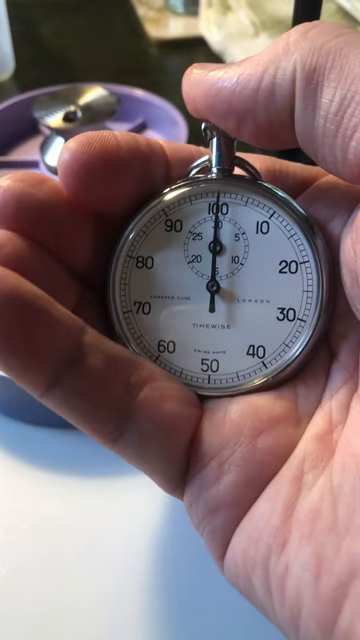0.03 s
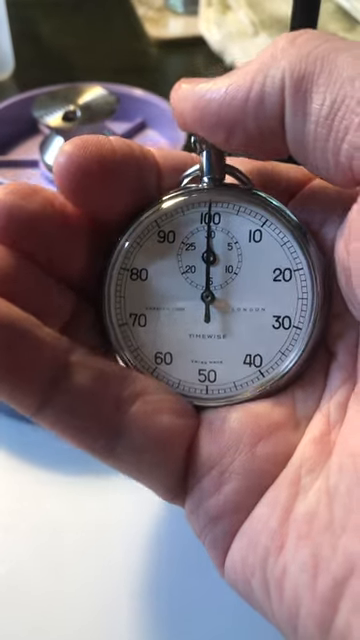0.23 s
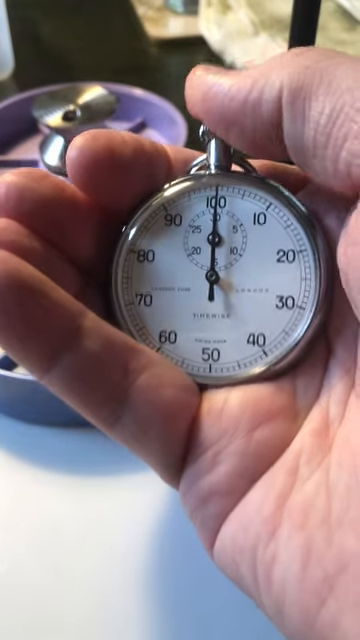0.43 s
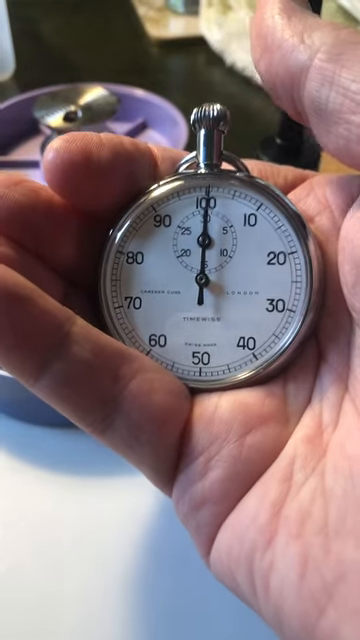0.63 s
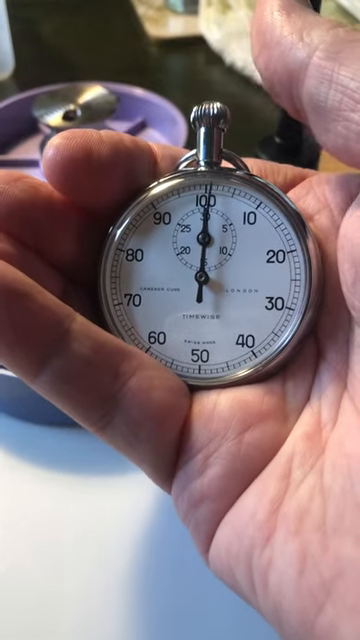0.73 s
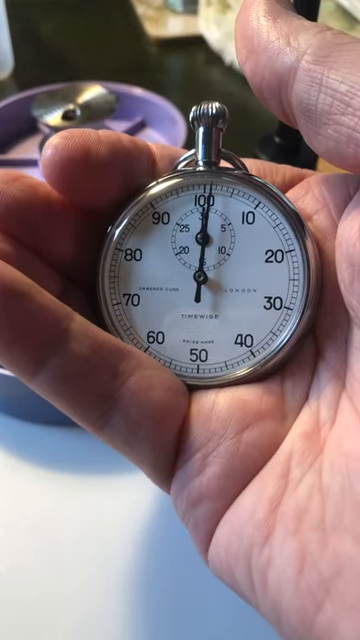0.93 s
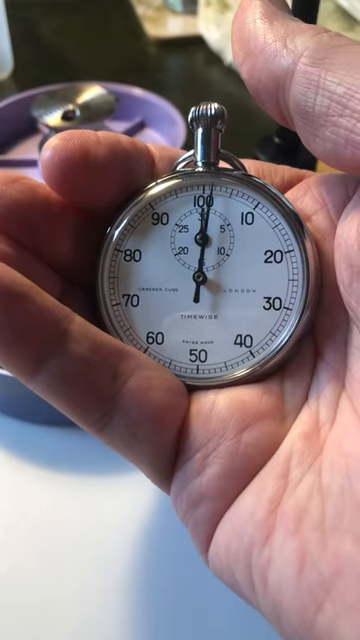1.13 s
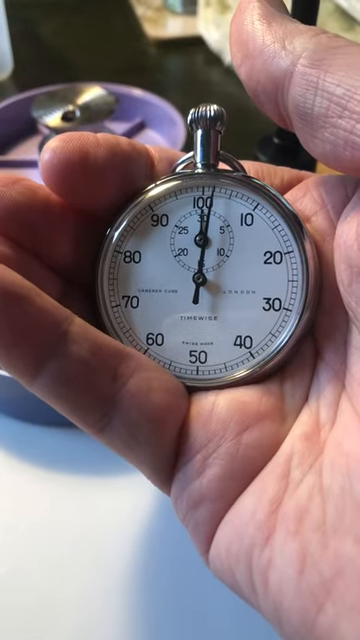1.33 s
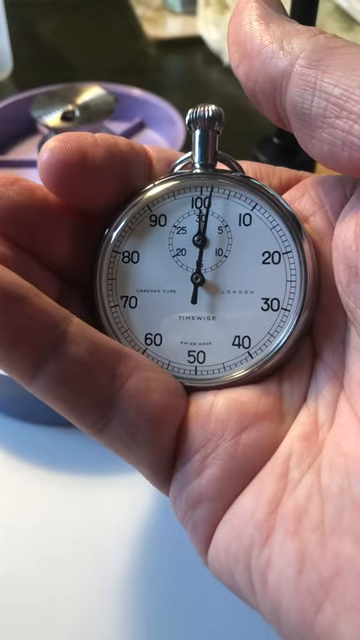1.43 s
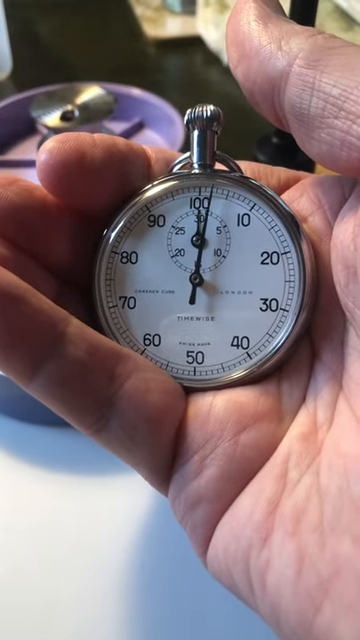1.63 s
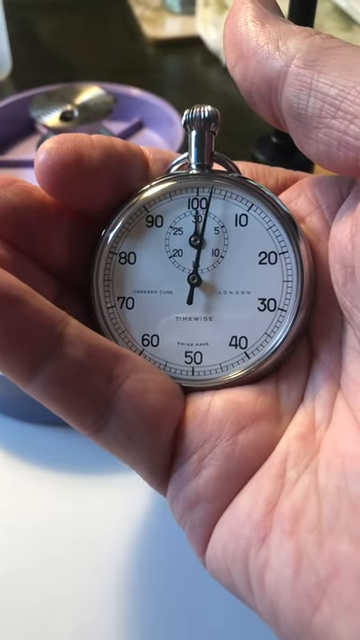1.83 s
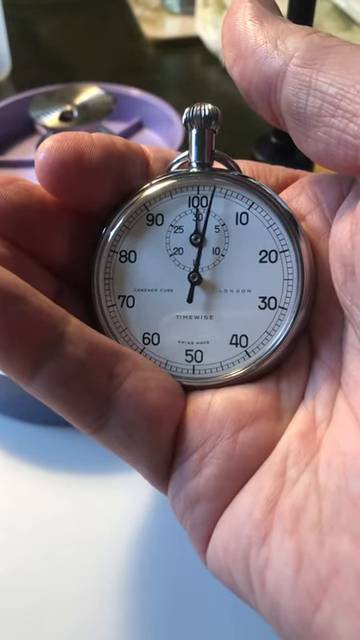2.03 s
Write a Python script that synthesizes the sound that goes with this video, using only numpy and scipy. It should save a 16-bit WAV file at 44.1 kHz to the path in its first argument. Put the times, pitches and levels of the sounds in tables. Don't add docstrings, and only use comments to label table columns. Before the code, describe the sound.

Mechanical stopwatch crown clicked down and released, two sharp metallic snaps, then faint rapid ticking

```python
import sys
import numpy as np
from scipy import signal
from scipy.fft import rfft, irfft
from scipy.io import wavfile
from scipy.ndimage import uniform_filter1d

SR = 44100
rng = np.random.default_rng(int(sys.argv[2]) if len(sys.argv) > 2 else 0)


def store_pcm(level_fs):
    pcm = np.round(np.clip(level_fs, -1, 1) * 32767).astype(np.int16)
    wavfile.write(sys.argv[1], SR, np.atleast_2d(pcm).T)


def gain_from_decibels(decibels):
    exponent = np.asarray(decibels, float) / 20
    return 10 ** exponent


N = 92610

# centre_hz, width_hz, level_db
PRESS_WALL_COLOUR = [(1700, 650, -18.5), (2623, 66, -3), (3150, 400, -3), (4400, 500, -14.5),
                     (4900, 290, -7.5), (5700, 2100, -4), (5900, 330, -6.5), (7300, 540, -7.5),
                     (8200, 600, -5.5), (10200, 1500, -16.5), (11600, 990, -12), (13200, 1800, -16),
                     (15000, 1000, -20.5)]


def band(x, hz, width):
    return signal.lfilter(*signal.iirpeak(hz, hz / width, fs=SR), x)


def unit(x):
    return x / np.sqrt(np.mean(x ** 2))


def resonant_noise(hz, width):
    return band(band(rng.standard_normal(N), hz, width), hz, width)


def highpass(x, order, hz):
    return signal.sosfilt(signal.butter(order, hz, "highpass", fs=SR, output="sos"), x)


def coloured(points):
    hz, db = np.array(points, float).T
    log_hz = np.log(np.arange(N // 2 + 1) * SR / N + 1)
    gain = gain_from_decibels(np.interp(log_hz, np.log(hz), db, left=-70))
    return unit(irfft(rfft(rng.standard_normal(N)) * gain, N))


def strike(hits, modes, scatter_db=4.08):
    contact_s = .0001
    out = np.zeros(N)
    hz, db, t60 = np.array(modes, float).T[:, :, None]
    size = min(int(t60.max() * 1.3 * SR) + 8, N // 4)
    sign = (-1.) ** np.arange(len(modes))[:, None]
    balance = rng.standard_normal((len(hits), len(modes), 1))
    for (s, peak_db, tilt_db), luck in zip(hits, balance):
        i = int(s * SR) + 1
        t = (np.arange(i, i + size) / SR - s)[:N - i]
        gain = gain_from_decibels(db + tilt_db * np.log2(hz / 5000) + scatter_db * luck - 60 * t / t60)
        ring = gain * np.sin(2 * np.pi * hz * t) * sign
        out[i:i + size] += gain_from_decibels(peak_db) * ring.sum(0) * (1 - np.exp(-t / contact_s))
    return out


def snap(hits, modes):
    watch_low_hz = 2300
    split_hz = watch_low_hz * .9
    case = strike(hits, [m for m in modes if m[0] > split_hz], scatter_db=1.5)
    palm = strike(hits, [m for m in modes if m[0] <= split_hz], scatter_db=1.5)
    return highpass(case, 4, watch_low_hz) + palm


def echo(s, level_db, colour):
    wall_s, build_s = .0115, .003
    t60_low_s, t60_high_s = .42, .25
    near_db, near_t60_s = 11, .03
    i = int(s * SR)
    t = np.arange(N - i) / SR
    late = np.maximum(t - wall_s, 0)
    out = np.zeros(N)
    for hz, width, db in colour:
        t60 = np.interp(hz, [5000, 13000], [t60_low_s, t60_high_s])
        walls = (1 - np.exp(-late / build_s)) * gain_from_decibels(-60 * late / t60)
        near = gain_from_decibels(near_db - 60 * t / near_t60_s)
        grain_db = 1.5 * unit(uniform_filter1d(rng.standard_normal(N), size=300))
        tail = unit(resonant_noise(hz, 1.6 * width) * gain_from_decibels(grain_db))
        out[i:] += gain_from_decibels(level_db + db) * (walls + near) * tail[i:]
    return signal.sosfilt(signal.ellip(8, .3, 40, 15800, fs=SR, output="sos"), out)


def house():
    # centre_hz, width_hz, level_db
    room_modes = [(51, 9, -70.5), (29.8, 17, -88), (104, 30, -76.5), (167.95, 30, -64.5), (205, 46, -64.5),
                  (305, 50, -70.5), (383, 50, -72), (472, 70, -76.5), (640, 210, -73), (1030, 600, -85)]
    # time_s, swell_db
    traffic = [(0, -64.5), (0.499, -66.5), (.9, -65.5), (1.2, -63.5), (1.45, -59.5), (1.7, -63.5),
               (2.1, -69)]
    # frequency_hz, density_db_per_hz
    hiss_spectrum = [(530, -28.5), (900, -4.5), (1150, -1.5), (1220, -6.5), (2300, -14), (2470, -14.5),
                     (4150, -15), (9420, -17.5), (16000, -27.5)]
    s, db = np.array(traffic).T
    swell = gain_from_decibels(np.interp(np.arange(N) / SR, s, db - db.mean()))
    hum = [gain_from_decibels(d) * unit(resonant_noise(hz, 1.6 * w)) for hz, w, d in room_modes]
    hiss = gain_from_decibels(-74.5) * coloured(hiss_spectrum)
    return hum[0] + swell * sum(hum[1:]) + hiss


def touch():
    # start_s, peak_db, tilt_db_per_octave
    touch_hits = [
        (.0385, -72, -3),
        (.04065, -40, 0),
        (.04085, -33, -1),
        (.0414, -39, -1),
        (.0419, -48, 0),
    ]
    # frequency_hz, level_db, t60_s
    touch_modes = [(1500, -9, .005), (2050, -8, .004), (2620, -3, .005), (3150, -7, .004),
                   (4000, -11, .003), (4900, -11, .005), (5400, -11, .005), (6950, -10, .007),
                   (8370, -12, .004), (9580, -9, .004), (11000, -4, .003), (13500, -3, .0035),
                   (14800, -1, .003), (16250, -5, .004)]
    direct = highpass(strike(touch_hits, touch_modes, scatter_db=5), 2, 1100)
    return direct + echo(touch_hits[2][0], -80, PRESS_WALL_COLOUR)


def rattle():
    # start_s, level_db
    knocks = [
        (0.164, -68),
        (0.602, -65),
        (0.971, -68.5),
        (1.405, -66),
        (1.44, -82.5),
        (1.772, -67.5),
        (1.81, -79),
    ]
    # centre_hz, width_hz, level_db
    rattle_modes = [(1300, 400, -5.5), (2100, 520, -4), (2670, 110, -4.5), (2960, 130, -4.5),
                    (3376, 600, -6.5), (4000, 440, -5.5), (4370, 340, -10)]
    rise_s, t60_s = .004, .3
    t = np.arange(N) / SR
    shape = np.zeros(N)
    for s, db in knocks:
        shape += gain_from_decibels(db - 60 * np.maximum(t - s, 0) / t60_s) * np.clip((t - s) / rise_s, 0, 1)
    grain = gain_from_decibels(2.2 * unit(uniform_filter1d(rng.standard_normal(N), size=120)))
    body = sum(gain_from_decibels(db) * unit(resonant_noise(hz, w)) for hz, w, db in rattle_modes)
    return shape * unit(grain * body)


def press():
    # start_s, peak_db, tilt_db_per_octave
    press_hits = [
        (.2179, -44, -1),
        (.2295, -49, -3),
        (.2398, -47, 2),
        (.24097, -4, 0),
        (.24165, -19, -2),
        (.2432, -30, 0),
        (.2442, -33, -2),
    ]
    # frequency_hz, level_db, t60_s
    press_modes = [(620, -31, .005), (980, -26, .006), (1480, -27, .009), (2830, -9, .008),
                   (3270, -4.5, .007), (4300, -18, .004), (5600, -9.5, .006), (6600, -7, .003),
                   (7850, 0, .0027), (9000, -6.5, .004), (10700, -18, .004), (11800, -13, .003),
                   (13200, -21, .004), (15500, -10, .002)]
    # frequency_hz, level_db, t60_s
    press_ring = [(2650, -42, .15), (2735, -43, .14), (3252, -48, .1)]
    snap_s = press_hits[3][0]
    direct = snap(press_hits, press_modes) + strike([(snap_s, 0, 0)], press_ring, scatter_db=5.5)
    return highpass(direct, 2, 420) + echo(snap_s, -46.5, PRESS_WALL_COLOUR)


def escapement():
    # start_s, peak_db
    beats = [(0.3624, -51), (0.5613, -48.5), (0.7617, -47.5), (0.9614, -51.5), (1.1612, -48.5),
             (1.36, -52.5), (1.561, -51), (1.7605, -51), (1.9604, -50)]
    # before_drop_s, level_db
    lead_odd = [
        (.0205, -11),
        (.0125, -8),
    ]
    # before_drop_s, level_db
    lead_even = [
        (.0205, -18),
        (.013, -17),
    ]
    # after_drop_s, level_db
    rebounds = [
        (.0007, -3),
        (.0016, -7),
        (.003, -13),
    ]
    # frequency_hz, level_db, t60_s
    tick_modes = [(2700, -14, 0.0046), (3560, -7, 0.053), (4500, -20.5, 0.0057), (5100, -3, 0.0081),
                  (5840, -14, 0.0031), (6900, -4, 0.0069), (8030, -6, 0.0055), (9230, 1, 0.0063),
                  (9660, -2, 0.0061), (10630, -0.5, 0.011), (12200, -5, 0.0049), (12693, -3.5, 0.0051),
                  (14100, -15, 0.00406), (15330, -11.5, .004)]
    hits = []
    for k, (s, db) in enumerate(beats):
        leads = lead_odd if k % 2 else lead_even
        hits += [(s - lead, db + d, 0) for lead, d in leads]
        hits += [(s, db, 0)]
        hits += [(s + lag, db + d, 0) for lag, d in rebounds]
    return gain_from_decibels(-4.5) * strike(hits, tick_modes, scatter_db=2.5)


def squeak():
    start_s, length_s, level_db, pitch_hz = .385, .11, -81, 9920
    t = np.arange(N) / SR
    shape = np.sin(np.pi * np.clip((t - start_s) / length_s, 0, 1))
    return gain_from_decibels(level_db) * shape * np.sin(2 * np.pi * pitch_hz * t)


def scrapes():
    # start_s, length_s, level_db, centre_hz, width_hz
    slides = [
        (0.453, 0.018, -63.5, 2987, 4000),
        (.4845, 0.0084, -46, 8000, 4000),
        (.4855, 0.0081, -52, 3500, 2030),
    ]
    t = np.arange(N) / SR
    out = np.zeros(N)
    for s, length, db, hz, width in slides:
        shape = np.sqrt(np.clip((t - s) / length, 0, 1)) * (t < s + length)
        out += gain_from_decibels(db) * shape * unit(resonant_noise(hz, width))
    return out


def release():
    # start_s, peak_db, tilt_db_per_octave
    release_hits = [
        (.4730, -54, 2),
        (.4945, -18, -2),
        (.4951, -22, -3),
        (.49598, -3, 0),
        (.4969, -21, -3),
        (.4975, -23, -1),
        (.4981, -25, -3),
    ]
    # frequency_hz, level_db, t60_s
    release_modes = [(1430, -42, .009), (2250, -30, .007), (3430, -12.5, .0075), (4400, -11, .004),
                     (5200, -15, .005), (6940, -13.5, .008), (8300, -1, .0027), (9250, -2, .0035),
                     (10200, -11, .004), (11400, -8.5, .005), (12800, -25, .003), (14100, -29, .005),
                     (15600, -31, .004), (16150, -27, .004)]
    # frequency_hz, level_db, t60_s
    release_ring = [(3450, -40, .045), (4440, -56, .15), (4845, -55, .2)]
    # centre_hz, width_hz, level_db
    release_wall_colour = [(1700, 600, -11.5), (2750, 560, -10.5), (3500, 490, -3.5), (4450, 250, -7),
                           (4853, 200, -2.5), (5200, 300, -5), (6900, 700, -8), (8000, 1000, -3.5),
                           (9600, 1100, -9), (11500, 1100, -7), (13200, 1500, -14.5), (15000, 1000, -18)]
    snap_s = release_hits[3][0]
    direct = snap(release_hits, release_modes) + strike([(snap_s, 0, 0)], release_ring, scatter_db=2)
    return highpass(direct, 2, 1100) + echo(snap_s, -57, release_wall_colour)


def creaks():
    # start_s, peak_db, centre_hz, width_hz
    slips = [(0.656, -63, 6700, 500), (0.655, -64.5, 3870, 900), (.656, -60.5, 1700, 600),
             (.724, -67.5, 3280, 1500), (0.74, -56, 3200, 2000), (0.739, -58, 1300, 1200),
             (0.777, -56, 2240, 2300), (0.782, -62.5, 4500, 4500), (0.855, -65, 4750, 3000),
             (.91, -68.5, 2100, 602), (.94, -67.5, 3770, 2000), (1.256, -67.5, 901, 1200),
             (1.67, -63.5, 2100, 1200), (1.672, -63.5, 4400, 4000), (1.91, -66.5, 2100, 900),
             (1.911, -71, 4000, 3000)]
    rise_s, decay_s = .00015, .0037
    t = np.arange(N) / SR
    out = np.zeros(N)
    for s, db, hz, width in slips:
        late = np.maximum(t - s, 0)
        shape = (1 - np.exp(-late / rise_s)) * np.exp(-late / decay_s)
        out += gain_from_decibels(db) * shape * unit(resonant_noise(hz, 1.5 * width))
    return out


def thud():
    start_s, level_db, pitch_hz, t60_s = .787, -54, 112, .08
    knock = strike([(start_s, level_db, 0)], [(pitch_hz, 0, t60_s)], scatter_db=0)
    return 2 * band(knock, pitch_hz, 60)


def scene():
    watch = touch() + press() + escapement() + release()
    hand = squeak() + scrapes() + creaks() + thud()
    return (house() + rattle() + watch + hand)[None]


def low_pass(x):
    return signal.sosfilt(signal.butter(12, 17030, fs=SR, output="sos"), x)


def record(dry):
    low = signal.sosfiltfilt(signal.ellip(8, .1, 50, 15800, fs=SR, output="sos"), dry)
    shelved = low + gain_from_decibels(-15) * (dry - low)
    cut = signal.ellip(6, .5, 40, 16550, fs=SR, output="sos")
    return low_pass(signal.sosfilt(cut, shelved))


dry = scene()
out = record(dry)
store_pcm(out)
```